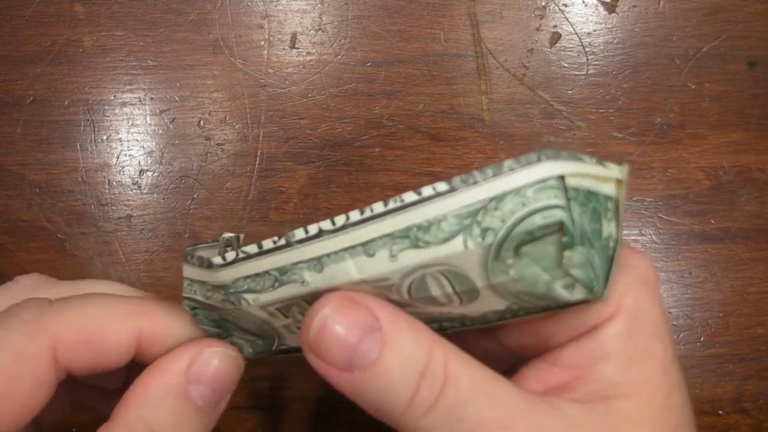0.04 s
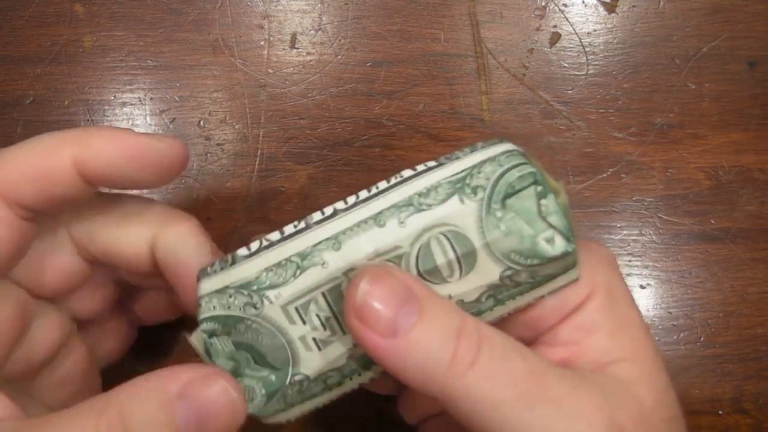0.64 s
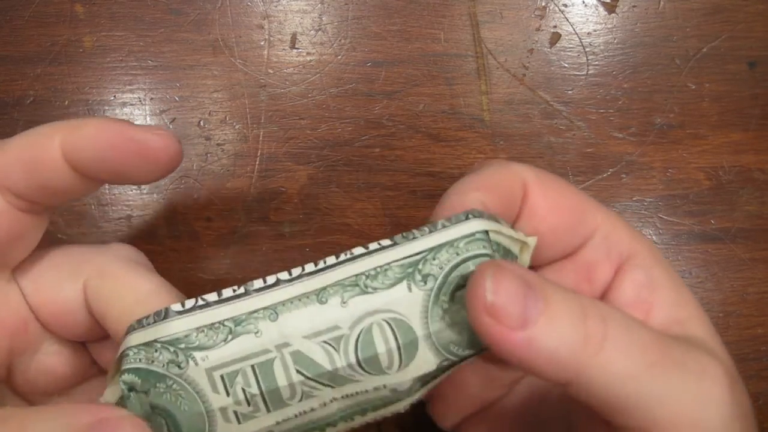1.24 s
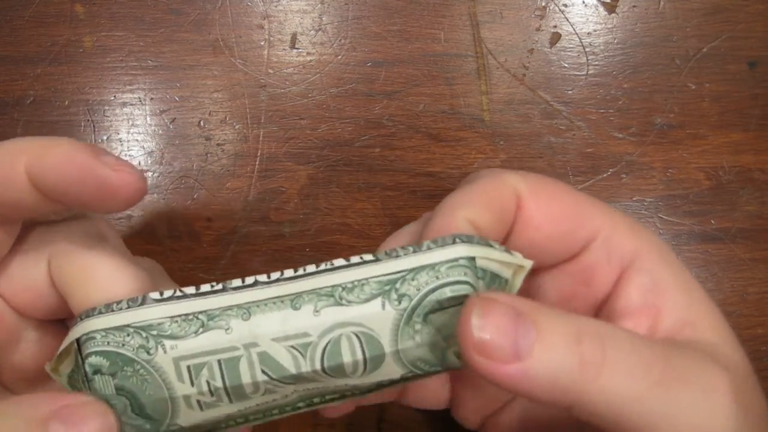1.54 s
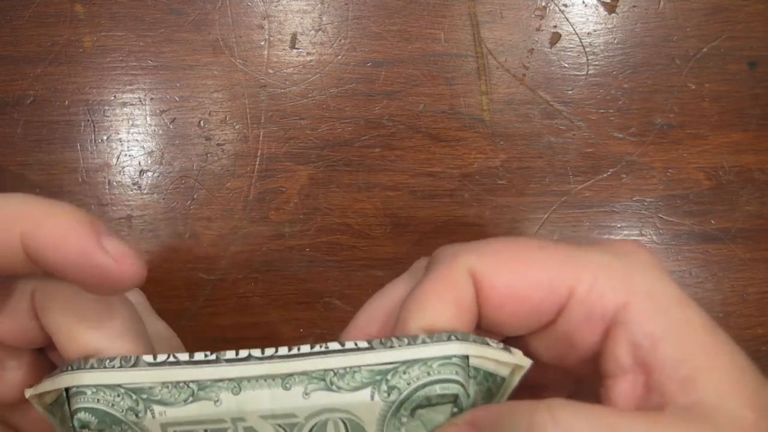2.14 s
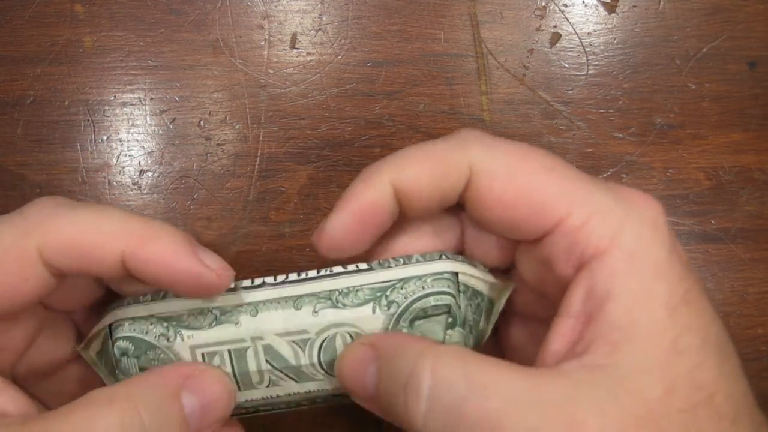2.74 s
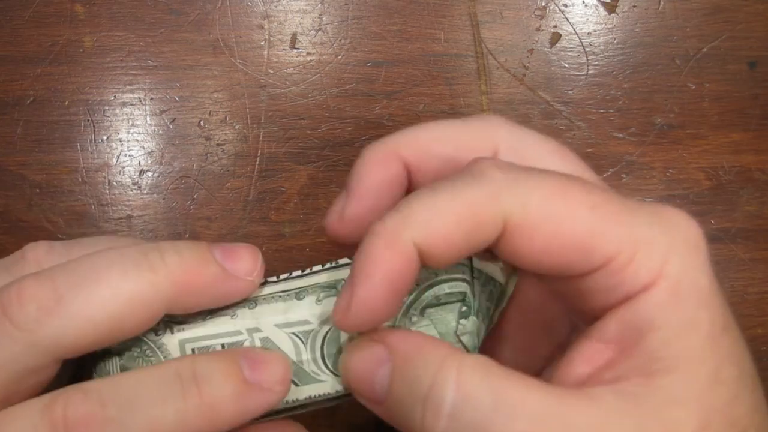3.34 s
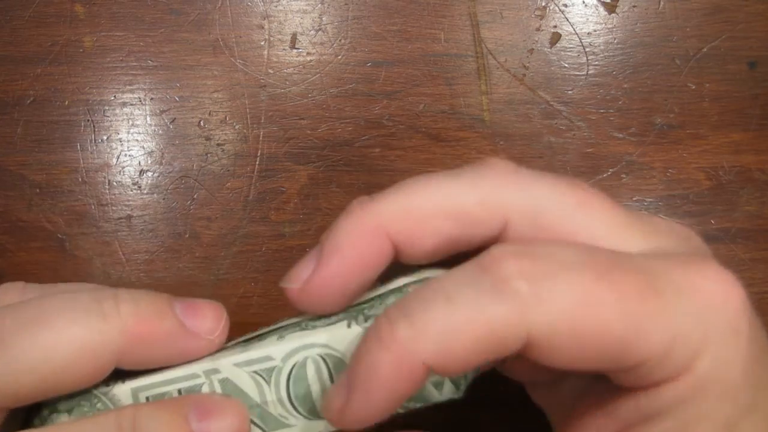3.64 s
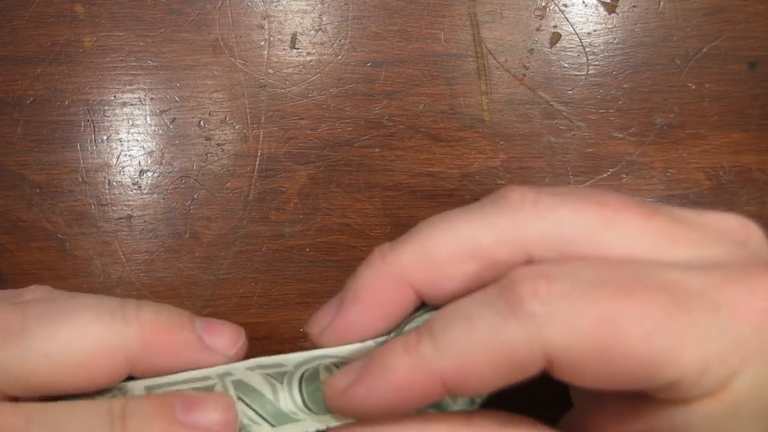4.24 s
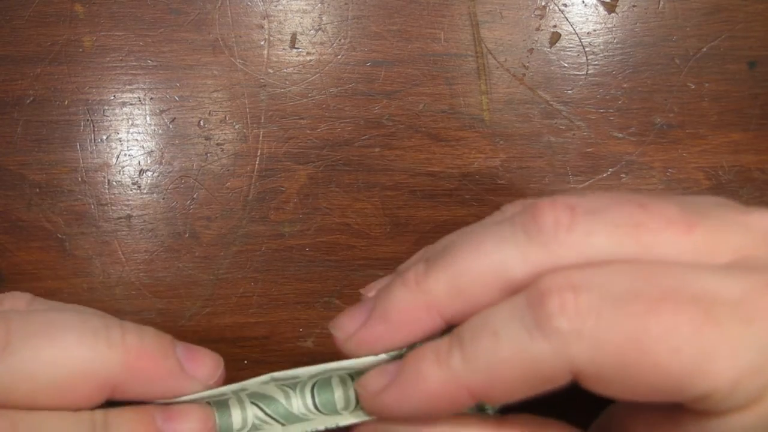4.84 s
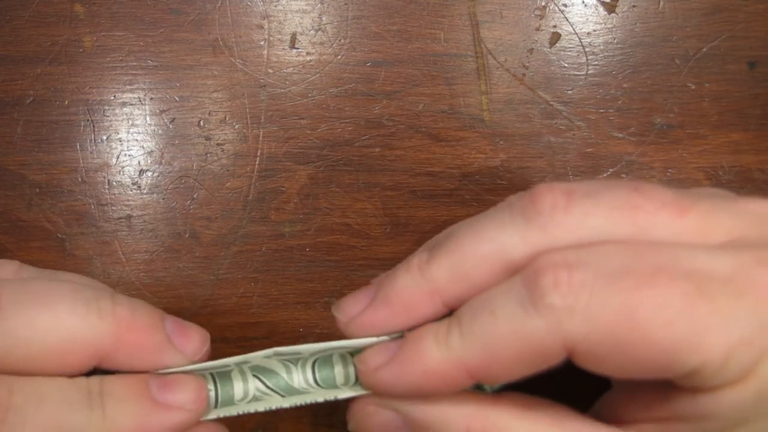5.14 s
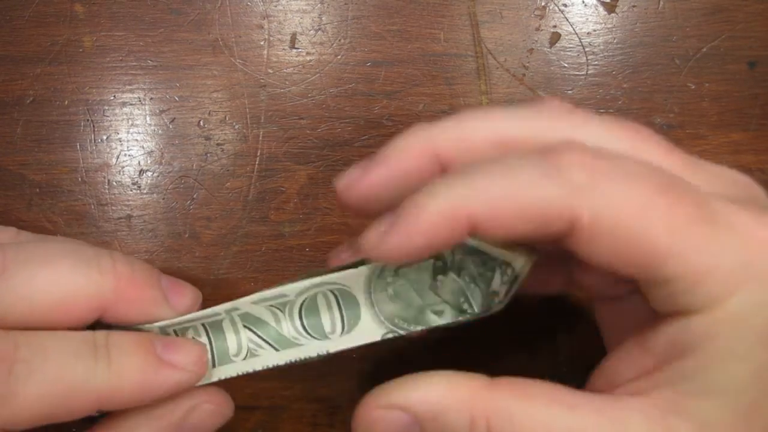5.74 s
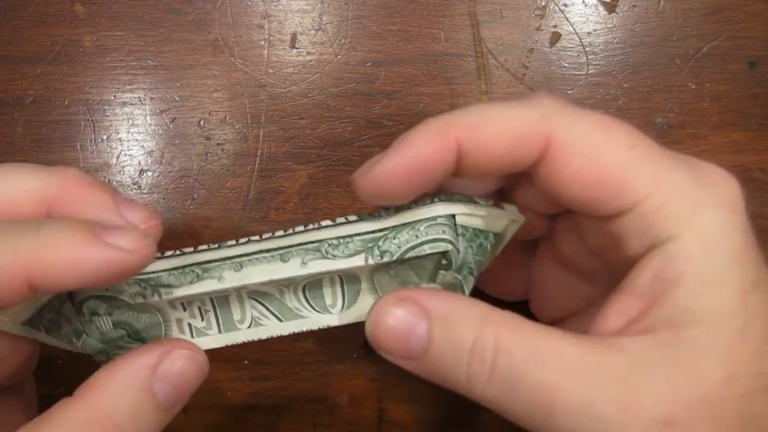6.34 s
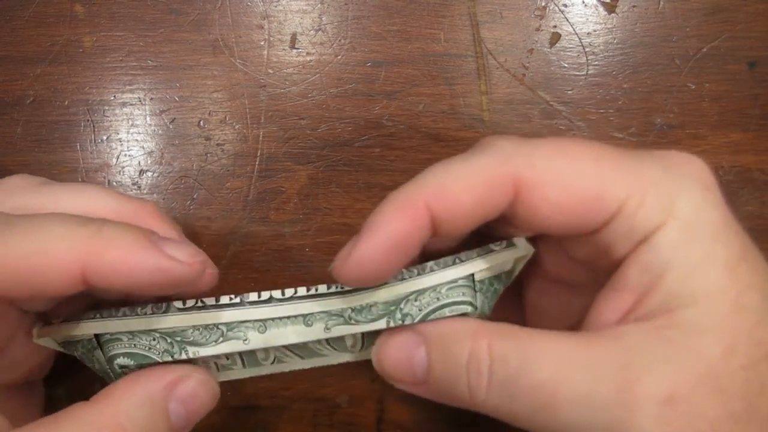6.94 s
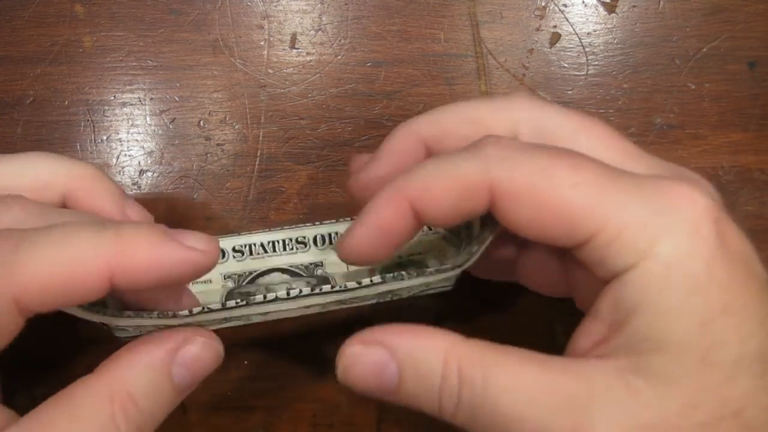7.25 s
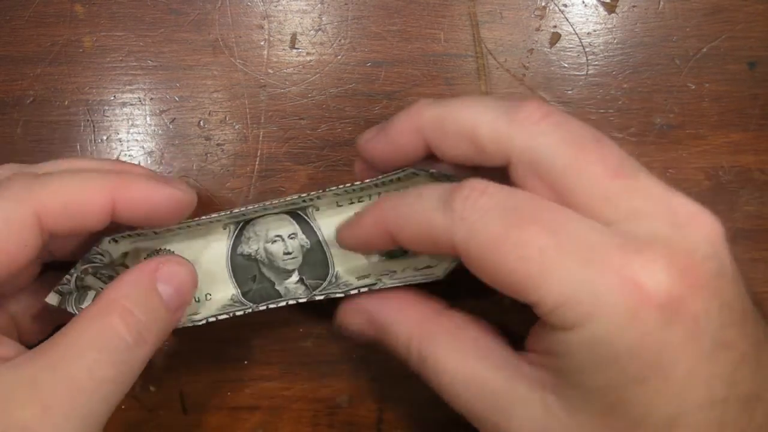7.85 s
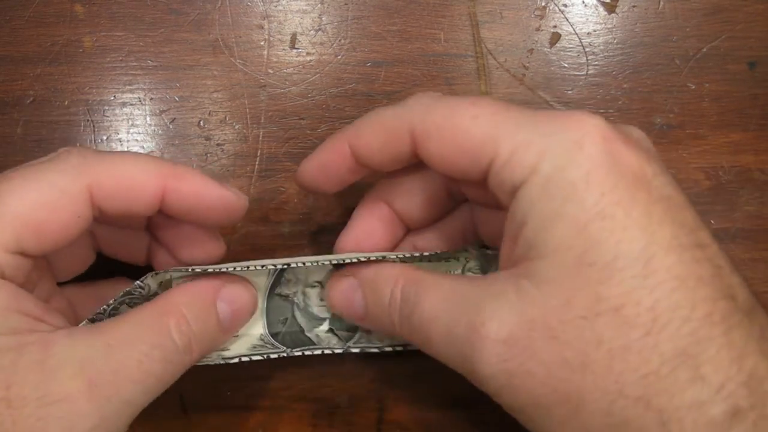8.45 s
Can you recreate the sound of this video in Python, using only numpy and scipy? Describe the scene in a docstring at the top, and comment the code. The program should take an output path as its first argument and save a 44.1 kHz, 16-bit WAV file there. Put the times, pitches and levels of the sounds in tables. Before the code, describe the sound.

Two hands fold a paper banknote over a wooden table, close to the microphone. Fingertips slide along the paper in short hissing strokes, mixed with tiny crackles and irregular sharp snaps. The handling is busy at first, thins out in the middle to a few creasing strokes and the two hardest snaps, then returns as lighter crinkling. The small room is quiet, with a faint low hum.

```python
"""A small quiet room, a wooden table, one microphone close to two hands folding a paper banknote.
The stiff paper gives sharp snaps and brief scuffs that bounce off the table. Fingertips slide along
the folds with a hiss, a taut fold sings faintly, and tiny creases crackle as the sheet bends.
The room answers briefly over a low hum and a deep drone. The hardest snaps hit the limiter."""
import sys
import numpy as np
from scipy import signal
from scipy.fft import rfft, irfft, next_fast_len
from scipy.io import wavfile
from scipy.ndimage import uniform_filter1d, minimum_filter1d, map_coordinates

SR = 44100
rng = np.random.default_rng(int(sys.argv[2]) if len(sys.argv) > 2 else 0)


def put_to_file(sound):
    """Save the sound as 16-bit audio at rate SR, in the file named by the first command-line argument."""
    columns = np.atleast_2d(sound).T  # one column per channel
    safe = np.clip(columns, -1, 1)
    whole_steps = np.round(safe * 32767)
    wavfile.write(sys.argv[1], SR, whole_steps.astype(np.int16))


N = 383669


def amp(db):
    """Decibels to gain."""
    return 10 ** (np.asarray(db) / 20)


def unit(x):
    """Scale to rms 1."""
    return x / np.sqrt(np.mean(x ** 2) + 1e-20)


def over_frequency(points, hz):
    """Join (Hz, value) points on a log axis."""
    knots_hz, values = np.transpose(points)
    return np.interp(np.log(hz + 1), np.log(knots_hz + 1), values)


def over_time(points):
    """Join (seconds, value) points, one value a sample."""
    times, values = np.transpose(points)
    return np.interp(np.arange(N) / SR, times, values)


def wobble(rate):
    """A smooth random curve, rate knots a second."""
    knots = rng.standard_normal(int(N * rate / SR) + 4)
    return map_coordinates(knots, [np.arange(N) * rate / SR])


def fade(t, t60):
    """A decay that loses 60 dB in t60 seconds."""
    return np.exp(-np.log(1000) * t / t60)


def filtered(x, gain):
    """Apply a gain that depends on frequency."""
    size = next_fast_len(N + SR // 2)
    return irfft(rfft(x, size) * gain(np.fft.rfftfreq(size, 1 / SR)), size)[:N]


def causal(gain):
    """The minimum-phase response with this gain: nothing sounds before the blow."""
    cepstrum = irfft(np.log(np.maximum(gain, 1e-6)))
    half = len(cepstrum) // 2
    return np.exp(rfft(np.r_[cepstrum[0], 2 * cepstrum[1:half], np.zeros(half)]))


def add(track, start, sound):
    """Mix a sound into a track at start seconds."""
    part = track[max(round(start * SR), 0):][:len(sound)]
    part += sound[:len(part)]


# Room tone at the microphone. Each row: frequency in Hz, relative spectral density in dB.
AIR_SPECTRUM = [(20, -1), (40, 0.5), (62, 0), (85, -1.5), (120, -9), (170, -14.5), (260, -14.5),
                (400, -22.5), (560, -18.5), (850, -27), (1200, -29), (2500, -28.5), (6000, -33.5),
                (16000, -43)]
def room_air(level_db=-57):
    """The still air of the room: soft noise, mostly bass."""
    air = filtered(rng.standard_normal(N), lambda hz: amp(over_frequency(AIR_SPECTRUM, hz)))
    return amp(level_db) * unit(air)


def tone(hz, waver_rad):
    """A sine of rms 1 whose phase wanders slowly."""
    t = np.arange(N) / SR
    return np.sqrt(2) * np.sin(2 * np.pi * hz * t + waver_rad * wobble(0.82))


# The hum behind the hands. Each row: frequency in Hz, rms level in dB.
HUM_TONES = [(59.8, -62), (172.3, -80), (360, -75.5), (549, -89), (839.8, -76)]
def hum():
    """A few faint, steady tones."""
    return sum(amp(db) * tone(hz, waver_rad=0.38) for hz, db in HUM_TONES)


# The low end of the room. Each row: time in seconds, rms level in dB.
DRONE_LEVELS = [(0, -62), (3.5, -60), (4.2, -49), (5.2, -48), (6.5, -49.5), (7.5, -51.5), (8.7, -53)]
def drone():
    """A deep, slightly wavering tone that swells halfway through."""
    return amp(over_time(DRONE_LEVELS)) * tone(hz=28, waver_rad=0.6)


# The small room around the table. Each row: frequency in Hz, seconds to fall by 60 dB.
ROOM_DECAY = [(300, 0.045), (1000, 0.14), (3000, 0.13), (9000, 0.11), (15000, 0.12)]
def room_echo(sound, onset_s):
    """The walls return a diffuse tail, fresh each time, that builds up within onset_s."""
    hz, t, spectra = signal.stft(rng.standard_normal(SR // 3), SR, nperseg=256)
    decay = fade(t, over_frequency(ROOM_DECAY, hz)[:, None])
    tail = signal.istft(spectra * decay, SR, nperseg=256)[1]
    tail *= 1 - np.exp(-(np.arange(len(tail)) / SR / onset_s) ** 2)
    return signal.fftconvolve(sound, tail / np.linalg.norm(tail))


def arch(start, length, power=0.57):
    """A finger speeds up and slows down: half a sine, raised to a power."""
    progress = np.arange(round(length * SR)) / (length * SR)
    swell = np.zeros(N)
    add(swell, start, np.abs(np.sin(np.pi * progress)) ** power)
    return swell


def plateau(start, length, settle_s=0.07):
    """The hands take hold of the sheet, settle and let go."""
    t = np.arange(N) / SR - start
    return np.clip(np.minimum(t, length - t) / settle_s, 0, 1)


# Fingertips sliding close to the microphone. Each row: start in seconds, length in seconds, then
# the drive in dB of hiss, of rasp over fizz and of dull rub over hiss.
FINGER_STROKES = [(0.02, 0.054, -47, -4.5, -15), (0.11, 0.1, -57, -1.5, -5), (0.2, 0.094, -33, -3.5, -12.5),
                  (0.29, 0.07, -52.5, -4, -11.5), (0.45, 0.029, -61, 3, 3), (0.58, 0.14, -49, 1.5, -6),
                  (0.71, 0.12, -44, -0.5, -6), (0.82, 0.22, -38.5, -4.5, -6.5),
                  (1.02, 0.18, -43.5, -2, -11.5), (1.195, 0.059, -43, 0, -6.0),
                  (1.255, 0.11, -41.5, -3, -5.5), (1.51, 0.063, -52.5, 1.5, -23),
                  (1.59, 0.056, -49.5, -7, -7.0), (1.935, 0.048, -51.5, 1, -6),
                  (2.065, 0.067, -50.5, 9, -3.5), (2.25, 0.115, -45, 2, -6.0),
                  (2.385, 0.15, -47, -0.5, -6.5), (2.52, 0.18, -48, 1, -3), (2.7, 0.16, -46.0, 1.5, -4),
                  (2.84, 0.11, -47, 2.5, -8), (2.975, 0.05, -38.5, 1, -8.5), (3.17, 0.11, -49.5, 0.5, -5),
                  (3.26, 0.065, -38, -2.5, -8), (3.44, 0.1, -55.5, 3, -8.5), (3.53, 0.16, -52.5, -5, -2),
                  (3.645, 0.075, -47.5, -6.5, -7.0), (3.748, 0.11, -41.5, -4, -7),
                  (4.14, 0.15, -37, -1.5, -16.5), (4.28, 0.065, -46, 5, -23), (4.345, 0.08, -48.5, -2, -27),
                  (4.425, 0.08, -51.5, -7, -21), (4.55, 0.19, -46.5, 0.5, -19),
                  (4.853, 0.087, -47.5, -5, -10.5), (4.935, 0.05, -53, -4.5, -11),
                  (5.0, 0.084, -66.5, -8, 0), (5.3, 0.068, -56.5, 3, -11), (5.42, 0.051, -64, -5, -8),
                  (5.6, 0.085, -48.5, -8, -8.5), (5.74, 0.2, -53, -2, -8), (5.995, 0.055, -57, -7, -10),
                  (6.085, 0.036, -50, 5, -20), (6.14, 0.09, -48, -16, -9.0),
                  (6.25, 0.095, -45.5, -4, -11.5), (6.37, 0.095, -45.0, 2, -6.5),
                  (6.465, 0.074, -50.5, 2, -18), (6.615, 0.058, -42.5, 1, -18), (6.72, 0.19, -47.5, 0, -8),
                  (6.92, 0.16, -45.5, -1.5, -6.5), (7.08, 0.065, -49.5, -2, -3), (7.23, 0.07, -56, 5, 2.5),
                  (7.3, 0.15, -52.5, -2, -4.5), (7.535, 0.047, -41, 3.5, -4.5), (7.6, 0.11, -52.5, 5, -3),
                  (7.705, 0.12, -46, -0.5, -15), (7.89, 0.098, -45.5, 2, -18), (7.97, 0.11, -55, -1, -20),
                  (8.055, 0.076, -48.0, -2.5, -8.5), (8.175, 0.125, -50, -4.5, -6),
                  (8.32, 0.29, -45.5, -1.5, -18), (8.46, 0.17, -45, -4, -21),
                  (8.655, 0.084, -45.5, -4.5, -23)]
# The sheet shifting faintly in the hands, except while pinched still. Each row: as for the strokes.
HAND_HOLDS = [(-.05, 0.27, -54.5, -2, -10), (.55, 1.384, -60.5, -1.5, 1.5), (2.17, 2.18, -56, 1, -3),
              (4.07, .69, -53, -2, -7), (5.74, 3.2, -59, 0.5, -3.5)]
def finger_contact():
    """How hard all fingers drive fizz, rasp and dull rub: a light grip fizzes, a firm one rasps."""
    power = np.zeros((3, N))
    for rows, shape in ((FINGER_STROKES, arch), (HAND_HOLDS, plateau)):
        for start, length, hiss_db, rasp_db, rub_db in rows:
            light = 1 / np.hypot(1, amp(rasp_db))
            gains = amp(hiss_db) * np.array([light, light * amp(rasp_db), amp(rub_db)])
            span = slice(max(round(start * SR), 0), round((start + length) * SR))
            power[:, span] += np.outer(gains, shape(start, length)[span]) ** 2
    return np.sqrt(power)


def shifting_noise(patchy_db=2.5):
    """Noise with resonances that come and go as the sheet changes shape."""
    spectra = signal.stft(rng.standard_normal(N), nperseg=1024)[2]
    patches = uniform_filter1d(rng.standard_normal(spectra.shape), size=4, axis=0)  # across frequency
    patches = uniform_filter1d(patches, size=12, axis=1)  # across time
    return signal.istft(spectra * amp(patchy_db * unit(patches)), nperseg=1024)[1][:N]


# Rubbed paper from close up. Each row: frequency in Hz, relative spectral density in dB.
PAPER_SPECTRUM = [(150, -7.5), (330, -5.5), (520, -2), (800, 3), (1050, -6.5), (1400, 0), (2300, -6),
                  (3600, -1.5), (4800, -5.5), (8300, -3.5), (12500, -9.5), (16000, -11)]
def friction(low_hz, high_hz, rough_db):
    """One band of rubbing, rms 1, roughened by the fibres catching and letting go."""
    def colour(hz):
        band_loss = np.sqrt(1 + (low_hz / (hz + 1)) ** 8 + (hz / high_hz) ** 8)
        return amp(over_frequency(PAPER_SPECTRUM, hz)) / band_loss
    return unit(filtered(shifting_noise(), colour) * amp(rough_db * wobble(260)))


# A finger presses along the fold. Each row: start in seconds, length in seconds, level in dB.
FOLD_SQUEAKS = [(4.282, .07, -54), (4.358, 0.055, -48), (4.64, .1, -53.5)]
def singing_fold(hiss, pitch_hz=3390, drift_hz=131.5, width_hz=260, over_hiss_db=-14):
    """Friction feeds one narrow mode of a taut fold, whose pitch drifts with the tension."""
    squeaks = sum(amp(db) * arch(start, length) for start, length, db in FOLD_SQUEAKS)
    drive = amp(over_hiss_db) * hiss + squeaks
    fold_hz = pitch_hz + drift_hz * wobble(2.9)
    flutter = unit(filtered(rng.standard_normal(N), lambda hz: 1 / (1 + (hz / width_hz) ** 2)))
    return drive * flutter * np.sqrt(2) * np.sin(2 * np.pi * np.cumsum(fold_hz) / SR)


def sliding(touch, rasp_db=-1, rub_db=-2.5, unsteady_db=1.5, room_db=-7):
    """Skin drags over paper: a dull rub, a hiss that turns raspy with pressure, and the singing fold."""
    light, firm, dull = touch
    rub = amp(rub_db) * dull * friction(low_hz=200, high_hz=2000, rough_db=3.5)
    rasp = amp(rasp_db) * firm * friction(low_hz=2000, high_hz=5600, rough_db=3.5)
    fizz = light * friction(low_hz=5000, high_hz=21000, rough_db=3)
    fold = singing_fold(hiss=np.hypot(light, firm))
    slide = (rub + rasp + fizz + fold) * amp(unsteady_db * wobble(45))
    return slide + amp(room_db) * room_echo(slide, onset_s=0.0027)[:N]


def buckle(panel_hz, ring_db, thud_db, crack_db, t60, size=4096,
           flip_db=-4, lag_s=0.0007, rise_s=0.00052, ring_octaves=0.36):
    """A snap of energy 1: a panel flips and bending waves rattle the sheet. A long t60 makes a scuff."""
    t, hz = np.arange(size) / SR, np.fft.rfftfreq(size, 1 / SR)
    # bending waves carry the highs ahead of the lows; lag_s is their delay at the panel's pitch
    flip = np.exp(-4j * np.pi * lag_s * np.sqrt(hz * panel_hz))
    envelope = fade(t, max(t60, 0.003) + 2 * lag_s) * (1 - np.exp(-t / rise_s))
    burst = rfft(rng.standard_normal(size) * envelope)
    waves = amp(flip_db) * flip + burst / np.sqrt(np.mean(np.abs(burst) ** 2))
    # the flip feeds all frequencies about equally
    smooth_power = uniform_filter1d(np.abs(waves) ** 2, size=50)
    waves /= causal(np.sqrt(np.abs(smooth_power)))
    # a small sheet radiates little bass
    lows = [(40, thud_db - 41), (330, thud_db - 6.5), (700, thud_db)]
    mids = [(1500, 0.0063), (3500, 0)]
    highs = [(6000, crack_db), (10500, crack_db), (15500, crack_db - 14.5), (18000, crack_db - 33)]
    colour_db = over_frequency(lows + mids + highs, hz)
    panel_db = ring_db * np.exp(-(np.log2((hz + 1) / panel_hz) / ring_octaves) ** 2)
    snap = irfft(waves * causal(amp(colour_db + panel_db))) * np.linspace(1, 0, size)
    return snap / np.linalg.norm(snap)


# The sheet bending in front of the microphone. Each row: time in seconds, mean crinkles a second.
CRINKLE_RATE = [(0, 30), (.75, 75.4), (2.2, 55), (3.3, 50), (3.6, 8), (5.1, 4), (5.5, 25), (5.85, 8),
                (6.3, 38), (7.6, 55), (8.4, 6)]
def crinkles(touch, over_hiss_db=16, spread_db=4.5, room_db=-8, floor_db=-60):
    """Small creases give way at random, each with its own pitch, louder under a faster finger."""
    track = np.zeros(N)
    light, firm, _ = touch
    hiss = np.hypot(light, firm) + amp(floor_db)
    starts = np.flatnonzero(rng.random(N) < over_time(CRINKLE_RATE) / SR)
    variations = np.clip(rng.standard_normal((len(starts), 3)), -2, 2)
    for start, (pitch, strength, bright) in zip(starts, variations):
        panel_hz = np.clip(3600 * np.exp(0.7 * pitch), 600, 12000)
        tick = buckle(panel_hz, ring_db=13, thud_db=-8.5, crack_db=1.5 + 4.7 * bright,
                      t60=0.005, size=1024)
        add(track, start / SR, hiss[start] * amp(over_hiss_db + spread_db * strength) * tick)
    return track + amp(room_db) * room_echo(track, onset_s=0.0023)[:N]


# Snaps and brief scuffs of the banknote, close to the microphone; the longer rows are scuffs.
# Each row: start in seconds, relative strength in dB, pitch of the ring in Hz, ring in dB, low thud
# in dB, high crack in dB, nominal seconds for the snap or scuff to fall by 60 dB.
PAPER_SNAPS_AND_SCUFFS = [(0.0729, -18, 3700, 9.5, -37, 3.5, 0.004), (0.162, -33.5, 516, 11, 2.5, -11, .02),
                          (0.2086, -26, 397, 5, -21, -5, 0.0092), (0.227, -8.5, 470, 29, -6.5, 18, .014),
                          (0.2661, -16, 4720, 9.5, -14.5, 19, .053),
                          (0.6845, -22, 3830, 12, 13.5, 16.5, 0.012), (0.7353, -23, 440, 13, 4, 10.5, .02),
                          (0.7719, -24, 1320, 1, -6, 8, .008), (0.8327, -26, 2470, 20, -14, 12, 0.011),
                          (0.89, -16.5, 3270, 11, 1, 9.5, .009), (0.8939, -17.5, 3130, 17, 12, 5, 0.025),
                          (0.9294, -9.5, 440, 9.5, 6, -10, 0.0083),
                          (0.9314, -11.5, 1990, 18, 7.5, -11, 0.021),
                          (1.091, -21, 8200, 15, 4, -6.5, 0.0099),
                          (1.1411, -11, 1460, 8.5, 0, -4.5, 0.0097), (1.151, -13, 386, 4.5, 4, 0.5, 0.035),
                          (1.3176, -4.5, 404, 11.5, -4.5, 4.5, 0.016),
                          (1.3697, -19, 2740, 11, 3, 9, 0.0046), (1.478, -33, 2450, 16, 8, 12, .015),
                          (1.637, -26.5, 3100, 15, 16, 10.5, .019), (1.658, -30.5, 716, 13, 0, -18, .022),
                          (1.9721, -27, 514, 19, -12, -10, 0.02), (1.981, -32, 7900, 17, -5, -11, .007),
                          (2.0327, -33, 2050, 6.5, 7, 4, 0.011), (2.0795, -20.5, 6240, 24, 3.5, -15, 0.006),
                          (2.1097, -19, 1350, 6, 20.5, -5.5, 0.0059), (2.2284, -32, 7430, 11, -5, -9, .012),
                          (2.2703, -24, 1260, -2, 8.5, 1, .032), (2.3114, -20.5, 1270, 17, -14, 3, 0.031),
                          (2.398, -25.5, 507, 15, 3.5, -6.5, 0.0094),
                          (2.5195, -10.5, 2680, 6.5, 0.5, 2.5, 0.0085),
                          (2.554, -19, 600, -3, 5, -16, 0.033), (2.5662, -2.7, 2090, 12.5, -2, -2, 0.0071),
                          (2.6834, -27.5, 1530, 12, 2, -27, 0.025), (2.7094, -5, 1520, 6.5, -9, -5.5, .011),
                          (2.7885, -26, 1130, 11, -14, -6, .04), (2.995, -24, 1253, 13.5, -6, -7, 0.048),
                          (3.145, -25, 4230, 21, 3, 2, 0.026), (3.3275, -16.5, 5430, 13, -8, -22, 0.02),
                          (3.4406, -10, 3200, 12, -6, -0.5, 0.029),
                          (3.9681, -5, 1480, 8.5, -12, -35.5, .008),
                          (3.9722, -11, 860, 10.5, 2.5, -14, 0.0061), (4.007, -15, 840, 25, 2, -3.5, 0.015),
                          (4.0136, -13.5, 1160, 12.5, 1, -32.5, 0.0053),
                          (4.2119, 0.6, 3080, 15, -9.5, -8.5, .006),
                          (4.9079, -19.5, 3600, 24, -3, 10, 0.015),
                          (5.2163, 5.5, 3010, 11.5, -19, 5.5, 0.015),
                          (5.3676, -38.5, 3420, 13, 2, 0.5, .008),
                          (5.6032, -23.5, 3680, 7, -20, -5, 0.0088), (5.6407, -29.5, 1770, 8, -6, -1, .036),
                          (6.0, -27, 3360, 9, 0, -3.5, 0.011), (6.007, -25.5, 1350, 9, 10, 8.5, 0.012),
                          (6.175, -32, 520, 17, 6, -3, .015), (6.297, -31, 450, 13, 9, -6, .02),
                          (6.402, -27, 1370, 11, 16.5, -1.5, 0.082), (6.4811, -23, 550, 15, -16, 5, .015),
                          (6.6599, -22.5, 1930, 12.5, 1.5, -40, 0.0099),
                          (6.822, -25, 6200, 12, 5, -7.5, .017), (6.9231, -8, 3820, 7.5, 3, -6.5, 0.0047),
                          (7.0002, -27, 3470, 13, 23, 0, .028), (7.5505, -25.5, 3530, 12, -1, 8, 0.025),
                          (7.5722, -28, 1700, 8, 6, -1.5, .008), (7.6117, -27.5, 1700, 11, 7, 6.5, 0.03),
                          (7.647, -29, 2190, 5, -5, 6, 0.019), (7.859, -17.5, 3640, 7.5, 2, -4, 0.032),
                          (7.9147, -26, 2000, 16, 15, -4, 0.054), (8.312, -10, 1280, 8, -18, -10.5, 0.019)]
def snaps_and_scuffs(gain_db=12, room_db=-7, table_db=-8):
    """Stiff paper buckles or is scuffed, each time with its own colour, table bounce and echo."""
    track = np.zeros(N)
    for start, strength_db, *colour in PAPER_SNAPS_AND_SCUFFS:
        sound = amp(strength_db + gain_db) * buckle(*colour) / np.hypot(1, amp(table_db))
        add(track, start, sound)
        # the bounce reaches the microphone a millisecond or two late and makes the sound hollow
        add(track, start + rng.uniform(0.0007, 0.002), amp(table_db) * sound)
        add(track, start, amp(room_db) * room_echo(sound, onset_s=0.0025))
    return track


def scene():
    """One microphone, with the paper close up and the room behind it."""
    touch = finger_contact()
    paper = snaps_and_scuffs() + crinkles(touch) + sliding(touch)
    return (paper + room_air() + hum() + drone())[None]


def record(dry, ceiling=1.0, soft_clip=0.62, top_hz=16100):
    """The recorder turns down the highest peaks, rounds off their tips and cuts the highest treble."""
    needed_gain = ceiling / np.maximum(np.abs(dry[0]), ceiling)
    limited = dry[0] * uniform_filter1d(minimum_filter1d(needed_gain, size=25), size=25)
    rounded = limited / (1 + np.abs(limited / soft_clip) ** 6) ** (1 / 6)
    return filtered(rounded, lambda hz: 1 / np.sqrt(1 + (hz / top_hz) ** 200))[None]


dry = scene()
out = record(dry)
put_to_file(out)
```